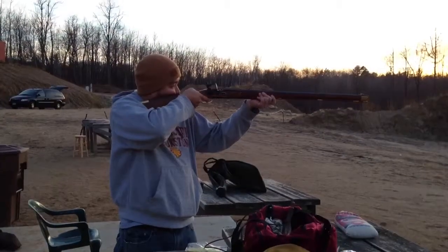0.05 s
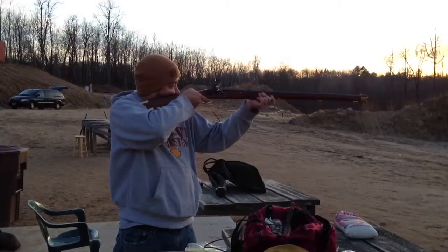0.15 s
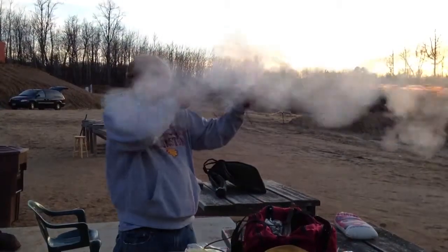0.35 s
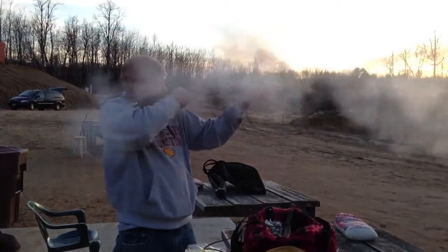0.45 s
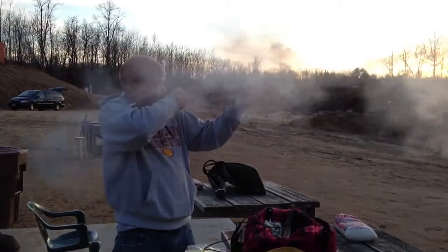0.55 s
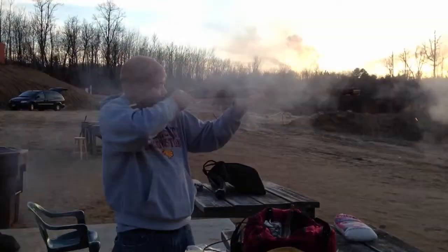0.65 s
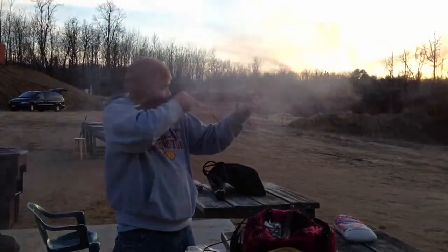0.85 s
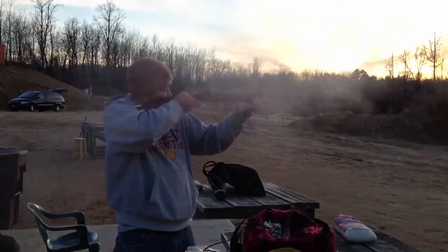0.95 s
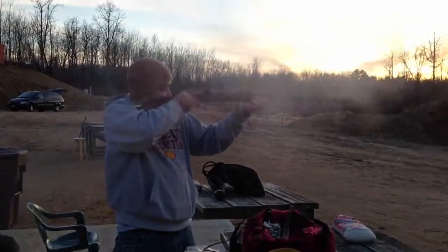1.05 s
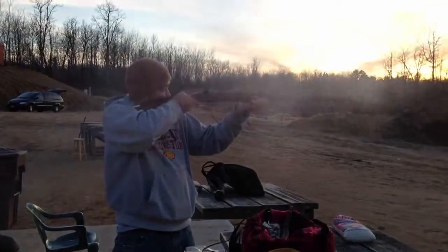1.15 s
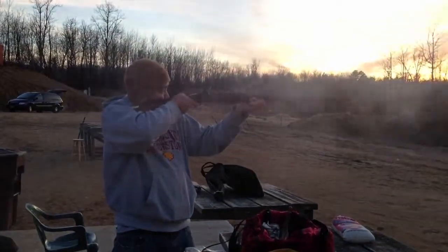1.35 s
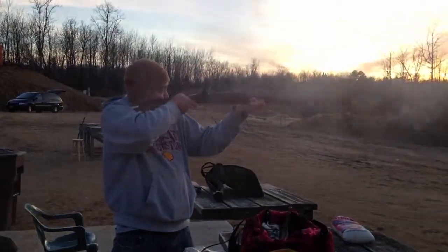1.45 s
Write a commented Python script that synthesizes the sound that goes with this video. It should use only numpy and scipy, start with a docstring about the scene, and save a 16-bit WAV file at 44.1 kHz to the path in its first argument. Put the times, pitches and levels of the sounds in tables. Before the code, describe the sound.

A flintlock rifle shot: steel lock clacks and flint scrapes, priming fizzes briefly, then a loud crackling blast with low boom, hard echo slaps and a dulling wash over open ground, close mono microphone.

```python
"""A flintlock rifle fires on an open range: burning powder is shaped noise, a sputter and then a bright spit and roar.
Before it the lock clicks with short noise-struck steel rings, and the flint scrapes as lumpy noise.
Berms, benches and the tree line answer with slaps (filtered bursts) and a long wash of noise whose treble fades.
Low booms and short sine swells over a rumble run from just before the shot through its echoes.
Quiet range air lies beneath."""
import sys
import numpy as np
from scipy import signal
from scipy.fft import rfft, irfft
from scipy.io import wavfile
from scipy.ndimage import uniform_filter1d

SR = 44100
rng = np.random.default_rng(int(sys.argv[2]) if len(sys.argv) > 2 else 0)


def bounce(signal):
    """Save signal as a 16-bit WAV file at the path given by the first command-line argument."""
    frames = np.transpose(np.atleast_2d(signal))
    limited = np.clip(frames, -1, 1)
    pcm = np.round(limited * 32767).astype(np.int16)
    wavfile.write(sys.argv[1], SR, pcm)


def volts(x):
    """Linear amplitude factor 10**(x/20) for a level x in dB, scalar or array-like."""
    e = np.asarray(x, float) / 20
    return 10 ** e


N = 66150  # samples, 1.5 s
SHOT_S = 0.3065  # the charge goes off


def evened(x):
    """Scales a signal to rms 1."""
    return x / np.sqrt(np.mean(x ** 2) + 1e-20)


def read_colour(points, hz):
    """Reads a spectrum table on a log frequency axis."""
    point_hz, value = np.transpose(points)
    return np.interp(np.log(hz + 1), np.log(point_hz + 1), value)


def level_curve(points):
    """Turns a level table into gain per sample, silent before its first point."""
    point_s, db = np.transpose(points)
    return volts(np.interp(np.arange(N) / SR, point_s, db, left=-200))


def add(mix, start_s, sound):
    """Mixes a sound in at a time, cut off at the end of the mix."""
    part = mix[round(start_s * SR):][:len(sound)]
    part += sound[:len(part)]


def highpass(x, order, cutoff_hz):
    """Butterworth bass cut."""
    return signal.sosfilt(signal.butter(order, cutoff_hz, "high", fs=SR, output="sos"), x)


def hiss(colour, lumpy_db=0, lump_s=.002):
    """Coloured noise of rms 1 whose level wanders at random in short lumps."""
    gain = volts(read_colour(colour, np.fft.rfftfreq(N, 1 / SR)))
    noise = irfft(rfft(rng.standard_normal(N)) * gain, N)
    lumps = evened(uniform_filter1d(rng.standard_normal(N), max(round(lump_s * SR), 2)))
    return evened(noise * volts(lumpy_db * lumps))


def dying(start_s, t60_s, rise_s=0.0009, hold_s=0):
    """Envelope: linear rise, hold, then exponential fall by 60 dB per t60."""
    t = np.arange(N) / SR - start_s
    fall_s = np.clip(t - rise_s - hold_s, 0, None)
    return np.clip(t / rise_s, 0, 1) * volts(-60 * fall_s / t60_s)


def range_air():
    """Quiet air of the range: steady coloured noise with slight level lumps."""
    # spectrum of the quiet air: pitch_hz [Hz], relative_level_db [dB]; and its overall level [dB]
    air_colour = [(15, -71), (25, -41), (90, -20.5), (176, 3), (424, -13.5), (849, -10.5), (2340, -20),
                  (2900, -29.5), (3140, -16), (3790, -14), (5660, -16.5), (14800, -20.5)]
    air_db = -62.5
    return volts(air_db) * hiss(air_colour, lumpy_db=0.5, lump_s=.02)


def wash():
    """Countless small echoes as noise, patchy in time and pitch, duller the longer they travel."""
    # level course before the air's effect: time_s [s], level_db [dB]
    wash_level = [(.305, -92), (.312, -7.5), (.345, -7.5), (.358, -14), (.455, -17), (.475, -10.5),
                  (.53, -16), (.55, -20), (.605, -17.5), (.62, -18), (.65, -23), (.8, -23.5), (.83, -27),
                  (.9, -25), (1.03, -28), (1.065, -35.5), (1.2, -39), (1.5, -46)]
    # spectrum of near echoes: pitch_hz [Hz], relative_level_db [dB]
    near_colour = [(210, -34), (350, -12.5), (550, -15.5), (850, -8), (1500, -3.5), (2700, -6),
                   (3400, -10.5), (5400, -14), (15500, -23)]
    # level drift on longer paths, falling in the treble: pitch_hz [Hz], drift_db_per_s [dB/s]
    path_drift = [(500, 6.5), (900, 14), (1500, 1.5), (2100, -3.5), (2800, -9), (3600, -12.5), (5000, -22),
                  (8000, -37), (15000, -46)]
    patchy_db, lumpy_db, smooth_per_s = -2, 1, .6  # unevenness fades with distance

    frames, hz = N // 64 + 5, np.fft.rfftfreq(256, 1 / SR)
    real, imaginary, patches = rng.standard_normal((frames, 129, 3)).T
    patches = uniform_filter1d(patches, size=5, axis=0)  # across pitch
    patches = evened(uniform_filter1d(patches, size=8, axis=1))  # across time
    lumps = evened(uniform_filter1d(rng.standard_normal(frames), size=3))
    travel_s = np.clip(np.arange(frames) * 64 / SR - SHOT_S, 0, None)

    colour = volts(read_colour(near_colour, hz))
    echoes = (real + 1j * imaginary) * (colour / np.linalg.norm(colour))[:, None]
    drift_db = read_colour(path_drift, hz)[:, None] * travel_s
    uneven_db = (patchy_db * patches + lumpy_db * lumps) * np.exp(-smooth_per_s * travel_s)
    echoes = echoes * volts(drift_db + uneven_db)
    return level_curve(wash_level) * signal.istft(echoes, nperseg=256, noverlap=192)[1][:N]


def booms():
    """Rumble of coloured noise with short sine swells under bell-shaped envelopes, from just before the shot."""
    # level course of the rumble: time_s [s], level_db [dB]
    rumble_level = [(.272, -50), (.29, -32), (.305, -20.5), (.37, -12), (.42, -29), (.47, -16),
                    (.53, -16.5), (.55, -21), (.7, -26), (.76, -43), (.83, -25.5), (.86, -22.5),
                    (.88, -22.5), (.93, -36), (.995, -32), (1.065, -47.5), (1.5, -46.5)]
    # rumble spectrum: pitch_hz [Hz], relative_level_db [dB]
    rumble_colour = [(15, -73.5), (25, -53), (107, -24), (165, 0), (224, -5.5), (293, -1.5), (403, -16),
                     (454, -16), (600, -25.5), (780, -49.5), (1320, -120)]
    # single swells: centre_s [s], peak_db [dB], pitch_hz [Hz], half_length [cycles]
    swells = [(0.28, -29.5, 884, 7.2), (0.2925, -29, 332, 1.3), (0.3058, -5, 324, 4.1),
              (0.31, -9, 599, 7.9), (.316, -11, 322, 3.2), (0.367, -17.5, 177.7, 5), (0.437, -8, 184, 2.35),
              (0.472, -9, 304, 6), (0.51, -15, 215, 1.1), (0.529, -7.5, 218, 5.1), (0.784, -18.5, 256, 1.8),
              (.858, -19, 303, 9.3), (0.876, -31.5, 265, 4.9), (0.892, -19, 200, 2.8),
              (0.904, -7.5, 182.3, 3.6)]

    out = level_curve(rumble_level) * hiss(rumble_colour, lumpy_db=1, lump_s=0.0052)
    for centre_s, peak_db, pitch_hz, cycles in swells:
        t = np.arange(-cycles / pitch_hz, cycles / pitch_hz, 1 / SR)
        bell = np.exp(-(3 * t * pitch_hz / cycles) ** 2)
        tone = np.sin(2 * np.pi * (pitch_hz * t + rng.random()))
        add(out, centre_s + t[0], volts(peak_db) * bell * tone)
    return out


def slaps():
    """A sharp push and a loose burst, coloured by the ground path into a broad ring plus air-dulled treble."""
    # slaps off hard faces: start_s [s], ring_peak_db [dB], ring_hz [Hz], t60_s [s],
    # treble_db [dB, treble peak against ring peak]
    faces = [(.463, -20, 1600, 0.026, 10), (0.4779, -0.5, 1650, 0.002, -9), (0.4862, 0.5, 1150, 0.0028, -9),
             (.495, -2.5, 1270, 0.0089, 0), (0.5729, 8, 1610, 0.013, -5.5), (.5752, -1.5, 1730, 0.017, -27),
             (0.6126, -8.5, 1480, 0.073, -12.5), (0.702, -9, 1160, 0.045, -22.5),
             (0.739, -11, 1390, 0.027, -40), (0.779, -13, 1410, 0.04, -48), (0.833, -14, 1490, 0.062, -50),
             (.917, -28.5, 1500, 0.016, -52), (1.103, -24, 900, 0.02, -47)]
    ring_width, treble_hz, treble_top_hz = 0.74, 4565, 7000  # width is bandwidth / pitch
    push_db, loose_gain = -11, 0.27
    rise_share, crisp_t60_s = 0.055, 0.06  # long slaps start softer and lose their push

    out, t = np.zeros(N), np.arange(SR // 8) / SR
    for start_s, peak_db, ring_hz, t60_s, treble_db in faces:
        rise = np.minimum(t / (rise_share * t60_s), 1)
        burst = loose_gain * rng.standard_normal(len(t)) * volts(-60 * t / t60_s) * rise
        burst[0] = -8 * volts(push_db) * np.exp(-(t60_s / crisp_t60_s) ** 2)  # one-sample push
        ring = signal.lfilter(*signal.iirpeak(ring_hz, 1 / ring_width, SR), burst)
        ring = signal.lfilter(*signal.iirpeak(ring_hz, .5 / ring_width, SR), ring)
        treble = signal.lfilter(*signal.iirpeak(treble_hz, 1.2, SR), burst)
        dulled_hz = treble_top_hz * np.exp(SHOT_S - start_s)  # later slaps are duller
        treble = signal.lfilter(*signal.butter(1, dulled_hz, fs=SR), treble)
        slap = ring / abs(ring).max() + volts(treble_db) * treble / abs(treble).max()
        add(out, start_s, volts(peak_db) * slap)
    return out


def lock():
    """Each blow chatters briefly, cracks and rings the steel; the flint scrapes down the steel among them."""
    # sear, flint on steel, cover thrown open: start_s [s], level_db [dB, before the bass cut],
    # crack_db [dB, share of bright crack], low_ring_db [dB, offset of rings below 2500 Hz]
    blows = [(0.188, -48, -2, -26.5), (0.1948, -41, -2, -8), (0.2012, -30, -23, -8),
             (0.2073, -19, -6.5, -15.5), (0.213, 6.5, -4.5, -9), (.2178, 2, 0.5, -5), (0.222, -5, -15, 3),
             (0.2331, -23.5, -3, -3), (.2515, -41, -19.5, -3.5)]
    # rings of the lock's steel: pitch_hz [Hz], relative_level_db [dB], t60_s [s]
    steel_rings = [(740, -24, .03), (1070, -16, 0.052), (1220, -10, .045), (1890, -9.5, 0.014),
                   (1909, 6, 0.069), (2050, -9.5, .016), (3820, -7, 0.017), (3940, 6, 0.01),
                   (4450, -3, .008), (5300, -14.5, .015), (7960, -8.5, 0.0093), (9700, -16, .015),
                   (13600, -5.5, 0.0044)]
    # scrape spectrum: pitch_hz [Hz], relative_level_db [dB]
    scrape_colour = [(180, -59.5), (300, -26), (1700, -2), (2740, -25), (3810, -1.5), (6360, -9),
                     (8840, -7.5), (15500, -31.5)]
    chatter_t60_s, crack_t60_s, scrape_s = .003, 0.022, .207

    out, t = np.zeros(N), np.arange(SR // 8) / SR
    for start_s, level_db, crack_db, low_ring_db in blows:
        ring = np.zeros(len(t))
        for pitch_hz, ring_db, t60_s in steel_rings:
            offset_db = low_ring_db if pitch_hz < 2500 else 0
            ring += volts(ring_db + offset_db - 60 * t / t60_s) * np.sin(2 * np.pi * pitch_hz * t)
        chatter = rng.standard_normal(len(t)) * volts(-60 * t / chatter_t60_s)
        ring = signal.fftconvolve(ring, chatter / np.linalg.norm(chatter))[:len(t)]
        bright_noise = np.diff(rng.standard_normal(len(t) + 1)) / 2
        crack = bright_noise * volts(crack_db - 60 * t / crack_t60_s)
        add(out, start_s, volts(level_db) * (ring / abs(ring).max() + crack))

    grind = volts(-13) * dying(scrape_s, 0.03, hold_s=0.0097)
    late_grind = volts(-28) * dying(scrape_s, 0.22)
    out = out + (grind + late_grind) * hiss(scrape_colour, lumpy_db=-4.5, lump_s=0.00033)
    return highpass(out, 4, 650)


def powder():
    """The priming sputters, then the charge drives turbulent gas out of the muzzle: a bright spit and a roar."""
    # priming sputters: time_s [s], level_db [dB]
    flash_level = [(.262, -48.5), (.276, -49), (.2845, -47), (.286, -27), (.304, -27.5), (.308, -32.5),
                   (.312, -84)]
    # priming spectrum: pitch_hz [Hz], relative_level_db [dB]
    flash_colour = [(240, -36), (400, -9), (1740, -16), (2470, -25), (2790, -19.5), (12300, -28.5),
                    (15500, -26.5)]
    # muzzle gas spectrum: pitch_hz [Hz], relative_level_db [dB]
    gas_colour = [(59, -44), (100, -24), (313, -2.5), (898, -16.5), (1730, -4), (2520, -16.5), (2870, 0.5),
                  (12800, -13.5), (15500, -19)]
    rise_s = 0.001

    gas = hiss(gas_colour, lumpy_db=0, lump_s=0.00067)
    roar = volts(-5.5) * dying(SHOT_S, 0.15, rise_s, hold_s=0.012) * gas
    bright_gas = highpass(gas, 2, 3500)
    spit = volts(-6.5) * dying(SHOT_S, 0.054, rise_s, hold_s=0.014) * bright_gas
    flash = level_curve(flash_level) * hiss(flash_colour, lumpy_db=2.5, lump_s=.0015)
    return roar + spit + flash


def scene():
    """All sources summed at one microphone."""
    mix = range_air() + wash() + booms() + slaps() + lock() + powder()
    return mix[None]  # one channel


def top_cut(x):
    """Nothing passes above the cut-off."""
    return signal.sosfilt(signal.butter(12, 16470, fs=SR, output="sos"), x)


def record(dry):
    """Gain control that ducks within milliseconds and recovers slowly, bass cut, soft overload, band limit."""
    duck_start_db, duck_share, recover_db_per_s = -40, .17, .5  # share: dB of duck per dB above start
    ceiling = volts(5)

    power_db = 10 * np.log10(abs(uniform_filter1d(dry[0] ** 2, size=400)) + 1e-12)
    recovery_db = np.arange(N) * recover_db_per_s / SR
    wanted_db = duck_share * (power_db - duck_start_db)
    # hold the deepest duck so far, easing off at the recovery rate
    duck_db = np.maximum(np.maximum.accumulate(wanted_db + recovery_db) - recovery_db, 0)
    ducked = dry / volts(uniform_filter1d(duck_db, size=200))

    bass_cut = highpass(ducked, 2, 90.04)
    overloaded = ceiling * np.tanh(bass_cut / ceiling)
    band_limit = signal.firwin(255, 15400, window=("kaiser", 8), fs=SR)
    finished = signal.oaconvolve(overloaded, band_limit[None], "same")
    return top_cut(finished)


dry = scene()
out = record(dry)
bounce(out)
```